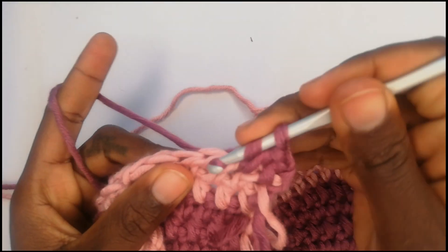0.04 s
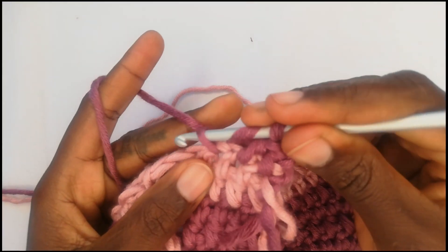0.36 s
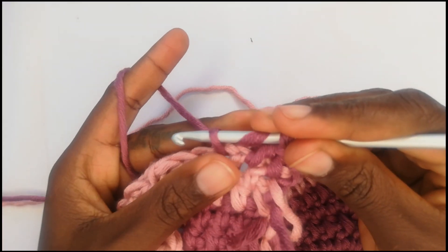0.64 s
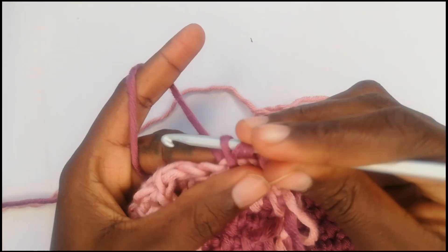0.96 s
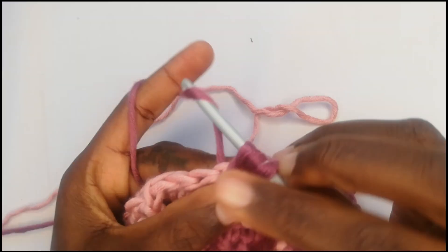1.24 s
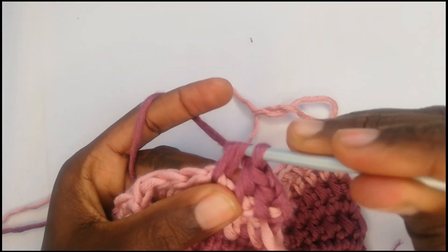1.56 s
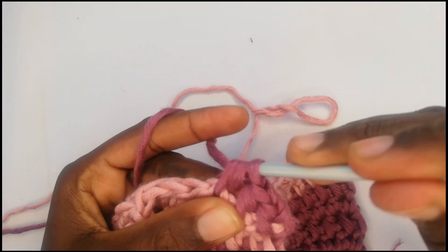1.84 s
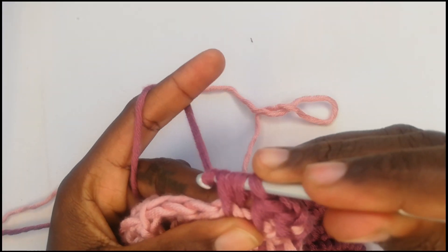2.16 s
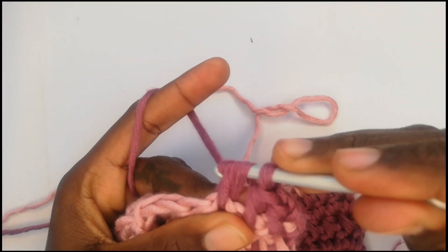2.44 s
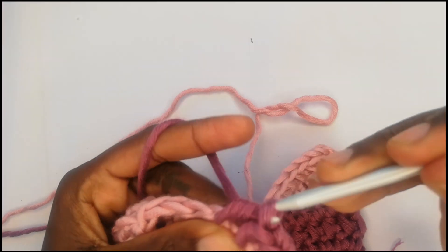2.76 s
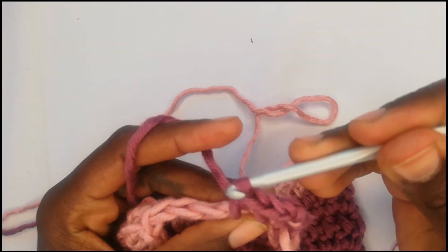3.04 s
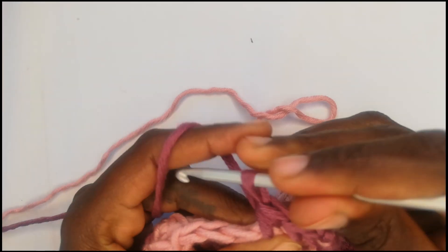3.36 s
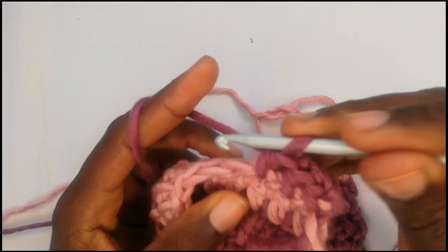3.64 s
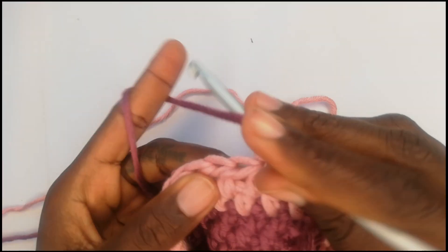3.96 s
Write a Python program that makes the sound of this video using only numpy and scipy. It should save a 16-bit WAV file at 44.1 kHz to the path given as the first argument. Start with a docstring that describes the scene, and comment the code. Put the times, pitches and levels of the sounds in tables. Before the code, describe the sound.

Soft crocheting, heard up close in a quiet room: yarn slides in short strokes, fingers brush fabric and the hook ticks now and then. Steady hiss, motor-like hums and a high whine on the right continue underneath.

```python
"""A quiet room hisses steadily, with low hums like far-off motors and a thin electrical whine on the right.
Over this, hands crochet close to a small stereo microphone. Yarn slides over finger and hook and fingers
brush the fabric: stick-slip friction, heard as soft, grainy swishes. The hook ticks as it snaps past
a strand or nail, and light bumps of hook and fingers excite a few quickly damped modes."""
import sys
import numpy as np
from scipy import signal
from scipy.fft import rfft, irfft
from scipy.io import wavfile
from scipy.ndimage import uniform_filter1d

SR = 44100
rng = np.random.default_rng(int(sys.argv[2]) if len(sys.argv) > 2 else 0)


def waveform_to_disk(signal):
    """Save audio, clipped to [-1, 1], as 16-bit WAV at the path in sys.argv[1]."""
    frames = np.transpose(np.atleast_2d(signal))
    scaled = np.clip(frames, -1, 1) * 32767
    samples = np.round(scaled).astype(np.int16)
    wavfile.write(sys.argv[1], SR, samples)


N = 176400
TIME, FREQS = np.arange(N) / SR, np.fft.rfftfreq(N, 1 / SR)


def amp(db):
    """Converts decibels to an amplitude ratio."""
    return 10 ** (np.asarray(db) / 20)


def unit(x):
    """Normalises to rms 1."""
    return x / np.sqrt(np.mean(x ** 2) + 1e-20)


def over_hz(table):
    """Interpolates each column of a table along a logarithmic frequency axis."""
    hz, *columns = np.transpose(table)
    return np.array([np.interp(np.log(FREQS + 1), np.log(hz), column) for column in columns])


def coloured(white, spectrum):
    """Linear filtering gives white noise a left and a right spectral density."""
    return irfft(rfft(white) * amp(over_hz(spectrum)), N) * np.sqrt(SR / 2)


def drift(rate_hz):
    """Low-pass filtered noise: a random fluctuation of rms 1."""
    return unit(irfft(rfft(rng.standard_normal(N)) * np.exp(-(FREQS / rate_hz) ** 2), N))


def tone(hz, waver, rate_hz):
    """Frequency modulation: a sine of rms 1 whose pitch wanders by the fraction waver."""
    cycles = np.cumsum(hz * (1 + waver * drift(rate_hz))) / SR
    return np.sqrt(2) * np.sin(2 * np.pi * (cycles + rng.random()))


def place(mix, start_s, sound, pan_db):
    """Adds a short sound to the mix; a level difference sets its direction."""
    part = mix[:, max(round(start_s * SR), 0):][:, :sound.shape[-1]]
    part += (amp([[pan_db / 2], [-pan_db / 2]]) * sound)[:, :part.shape[1]]


# Spectrum of the hiss. Each row: frequency in Hz, left and right density in dB per Hz.
HISS_SPECTRUM = [(25, -79, -77.5), (50, -80.5, -82.5), (90, -81.5, -81), (180, -84, -86.5), (295, -89, -89),
                 (594, -92, -93), (830, -89, -92), (1320, -92.5, -92.5), (2170, -93.5, -94),
                 (3360, -94, -94.5), (4900, -95.5, -97), (7000, -97.5, -99), (8550, -99.3, -95.5),
                 (10150, -101, -95), (10800, -102.5, -106), (13300, -104, -105), (15500, -107, -108)]
# Likeness of the two sides. Each row: frequency in Hz, coherence, phase lead of the left in radians.
HISS_COHERENCE = [(58, 1, 0), (142, 0.74, 0.5), (258, .3, -1.1), (505, 0.69, -3), (780, 0.57, -3.5),
                  (1320, 0.32, -6), (2500, 0.26, -9), (5530, 0.033, -19)]


def room_hiss():
    """Partially coherent noise: the two sides are alike only at long wavelengths."""
    coherence, lead = over_hz(HISS_COHERENCE)
    left, independent = rfft(rng.standard_normal((2, N)))
    right = coherence * np.exp(-1j * lead) * left + np.sqrt(1 - coherence ** 2) * independent
    return coloured(irfft(np.array([left, right]), N), HISS_SPECTRUM)


# Envelopes of the three hums. Each row: time in seconds, level in dB.
DEEP_LEVELS = [(0, -54.5), (.25, -50), (.6, -49.5), (1.05, -65.5), (1.45, -58), (1.87, -52.5), (2.4, -57),
               (2.8, -67.5), (4, -81)]
WAVERING_LEVELS = [(0, -58), (.6, -68.5), (.95, -59), (1.25, -57), (1.4, -64.5), (1.8, -68.5), (2.05, -58),
                   (2.25, -64), (2.55, -62.5), (3.3, -64.5), (3.6, -78)]
MOTOR_LEVELS = [(0, -74), (2.3, -74), (2.6, -65.5), (3.2, -66), (3.6, -57.5), (3.85, -56.5), (4, -64)]
# Partials of the motor hum. Each row: harmonic number, relative level in dB.
MOTOR_HARMONICS = [(2, -10), (3, -2.5), (4, -15), (5, -23.5), (6, -18.5)]


def hums(deep_hz=87.6, wavering_hz=128.7, motor_hz=52.2):
    """Slow amplitude modulation: two tones and a harmonic series swell and fade like far-off motors."""
    motor = sum(amp(db) * tone(k * motor_hz, waver=0.0034, rate_hz=2.46) for k, db in MOTOR_HARMONICS)
    deep = tone(deep_hz, waver=0.0059, rate_hz=3.8)
    wavering = tone(wavering_hz, waver=0.0289, rate_hz=6.7)
    drones = [(deep, DEEP_LEVELS), (wavering, WAVERING_LEVELS), (motor, MOTOR_LEVELS)]
    return sum(drone * amp(np.interp(TIME, *np.transpose(levels))) for drone, levels in drones)


# Tones of the whine. Each entry: frequency in Hz.
WHINE_PITCHES = [1238, 6099, 9518, 9997, 13900]
# Their strengths, in the same order. Each row: left level in dB, right level in dB.
WHINE_LEVELS = [(-79, -79), (-94, -75.5), (-89, -80.5), (-75.5, -49.5), (-98, -83)]


def electrical_whine():
    """A line spectrum: the electronics give thin, almost steady tones."""
    return sum(amp(sides_db)[:, None] * tone(hz, waver=0.000096, rate_hz=2.3)
               for hz, sides_db in zip(WHINE_PITCHES, WHINE_LEVELS))


def friction(strokes, spectrum, snaps_per_s=4500, spread_db=2.5, snap_share=0.43):
    """Stick-slip friction: fibres catch and let go in tiny snaps over a hiss, in bell-shaped strokes."""
    power = sum(amp(db) ** 2 * np.exp(-((TIME - centre) / half) ** 2) for centre, half, db in strokes)
    sizes = amp(spread_db * np.minimum(rng.exponential(1, N), 4))
    snaps = (rng.random(N) < snaps_per_s / SR) * sizes * rng.standard_normal((2, N))
    hiss = rng.standard_normal((2, N))
    drive = np.sqrt(snap_share) * unit(snaps) + np.sqrt(1 - snap_share) * hiss
    sticking = unit(amp(1.1 * drift(rate_hz=131)))  # uneven grip within a stroke, 1.1 dB rms
    return coloured(drive * sticking * np.sqrt(power), spectrum)


# Strokes of the yarn. Each row: centre in seconds, half-width in seconds, gain in dB.
YARN_STROKES = [(.07, 0.061, -6.5), (.14, .03, -7.5), (.215, 0.033, -7), (.385, 0.047, -3.5),
                (.455, 0.066, -1), (1.05, .05, -14), (1.175, .035, -9), (1.36, .06, -9.5),
                (1.535, 0.085, -1), (1.54, 0.025, -2.5), (2.12, .05, -11), (2.62, .06, -14),
                (2.705, 0.022, -2), (2.87, .07, -12.5), (3.08, .015, -14), (3.365, 0.058, -6),
                (3.63, .03, -7.5), (3.85, .06, -10), (4.0, .03, -7)]
# Their spectrum at 0 dB gain. Each row: frequency in Hz, left and right density in dB per Hz.
YARN_SPECTRUM = [(1020, -112, -110), (2870, -104, -99), (4320, -103, -90.5), (5350, -101, -86),
                 (6700, -100, -89.5), (8270, -94, -83.5), (9830, -96, -84), (10800, -101, -90),
                 (12400, -104, -100), (15700, -111, -107)]


def yarn_slides():
    """Sliding friction of yarn over finger and hook radiates a bright swish."""
    return friction(YARN_STROKES, YARN_SPECTRUM)


# Strokes on the fabric. Each row: centre in seconds, half-width in seconds, gain in dB.
FABRIC_STROKES = [(.12, 0.23, -17), (.39, .035, -17), (1.1, 0.16, -11), (1.35, 0.078, -14),
                  (2.12, 0.078, -15), (2.35, 0.019, -14), (2.58, .03, -15), (2.696, 0.0089, -1),
                  (2.715, 0.0058, -8), (2.71, .045, -8), (3.075, 0.0092, -9), (3.35, 0.07, -10),
                  (3.53, 0.042, -9), (3.63, 0.034, -9.5), (3.88, 0.15, -11)]
# Their spectrum at 0 dB gain. Each row: frequency in Hz, left and right density in dB per Hz.
FABRIC_SPECTRUM = [(450, -104, -106), (810, -82.5, -93), (1730, -103.5, -99), (2750, -85.5, -84),
                   (4040, -94, -96), (6200, -97, -88), (8500, -90, -99), (10600, -97, -92),
                   (11400, -85, -92), (12300, -94, -93), (15500, -100, -103)]


def fabric_brushes():
    """Friction of fingers on fabric, and of loops slipping off the hook, rustles with more midrange."""
    return friction(FABRIC_STROKES, FABRIC_SPECTRUM)


# Ticks of the hook. Each row: start in seconds, peak in dB, pitch in Hz, left minus right in dB.
HOOK_TICKS = [(.1419, -45, 6500, -10), (.1422, -35, 9300, -11), (1.389, -42.5, 7500, 5),
              (1.811, -46, 11200, 3), (1.8100, -38, 8260, 0), (1.8108, -38.5, 8480, 7),
              (3.074, -45, 8400, -5), (3.564, -47, 10800, 0)]


def hook_ticks(rise_s=0.0002, scratch_rad=0.3):
    """Damped vibration: the hook snaps past a strand or nail; fingers still it in about a millisecond."""
    out, t = np.zeros((2, N)), np.arange(256) / SR
    envelope = t / rise_s * np.exp(1 - t / rise_s)
    for start_s, db, hz, pan_db in HOOK_TICKS:
        scratch = scratch_rad * unit(uniform_filter1d(rng.standard_normal(len(t)), size=16))
        ring = np.sin(2 * np.pi * hz * t + scratch)
        place(out, start_s, amp(db) * envelope * ring, pan_db)
    return out


# Bumps of hook and fingers. Each row: start in seconds, level in dB, left minus right in dB,
# spectral tilt about 1500 Hz in dB per octave.
CONTACTS = [(.647, -52.5, 8, -6), (1.116, -43, 7, -2.5), (1.408, -48, 7, -1), (1.637, -43, 5, -2.5),
            (1.666, -48, 2, -6.5), (1.866, -42, 5, 3.5), (2.690, -47, 2, 1), (3.071, -44, -6, 0.5)]
# Their resonances. Each row: frequency in Hz, relative level in dB, time to decay by 60 dB in seconds.
CONTACT_MODES = [(343, -13, 0.02), (530, -14, .03), (920, -12, 0.014), (1253, -6, 0.033), (2205, -6, 0.019),
                 (3250, -8.5, 0.018), (5900, -11, 0.011)]


def soft_bumps(rise_s=0.0014, scuff_rad=0.82):
    """Modal ringing: padded contacts excite modes that decay exponentially, roughened by phase noise."""
    out, t = np.zeros((2, N)), np.arange(2048) / SR
    attack = np.minimum(t / rise_s, 1)
    for start_s, db, pan_db, tilt_db in CONTACTS:
        for hz, mode_db, t60 in CONTACT_MODES:
            scuff = scuff_rad * unit(uniform_filter1d(rng.standard_normal((2, len(t))), size=60))
            ring = np.sin(2 * np.pi * (hz * t + rng.random()) + scuff)
            decay = np.exp(-np.log(1000) * t / t60)
            gain = amp(db + mode_db + tilt_db * np.log2(hz / 1500))
            place(out, start_s, gain * attack * decay * ring, pan_db)
    return out


def scene():
    """Superposition: the handwork adds to the sounds of the room."""
    background = room_hiss() + hums() + electrical_whine()
    return background + yarn_slides() + fabric_brushes() + hook_ticks() + soft_bumps()


def record(dry):
    """Band limiting: a linear-phase low-pass filter removes the highest treble."""
    lowpass = signal.firwin(801, cutoff=15680, window=("kaiser", 9), fs=SR)
    return signal.oaconvolve(dry, lowpass[None], "same")


dry = scene()
out = record(dry)
waveform_to_disk(out)
```